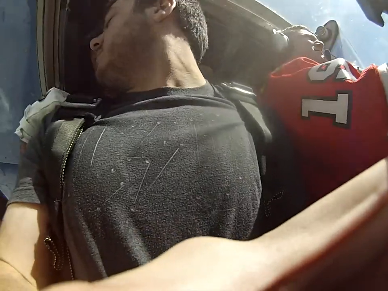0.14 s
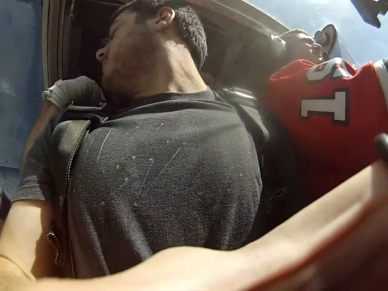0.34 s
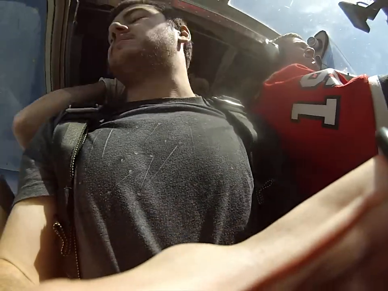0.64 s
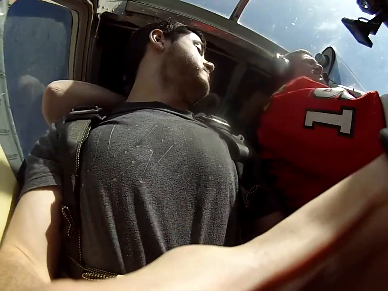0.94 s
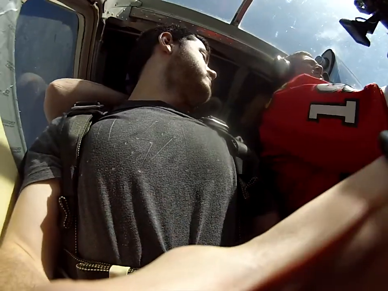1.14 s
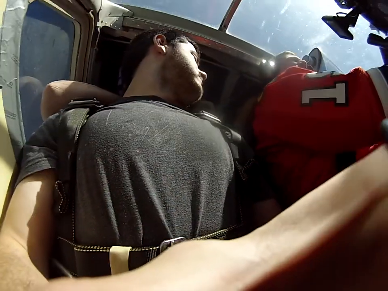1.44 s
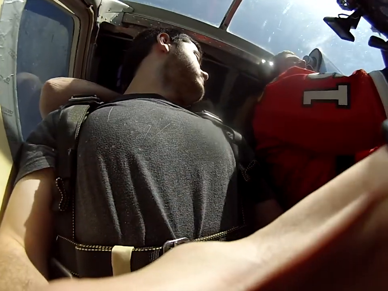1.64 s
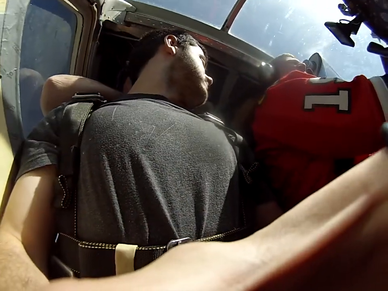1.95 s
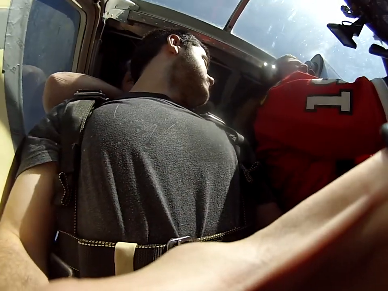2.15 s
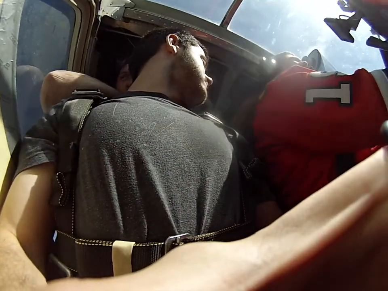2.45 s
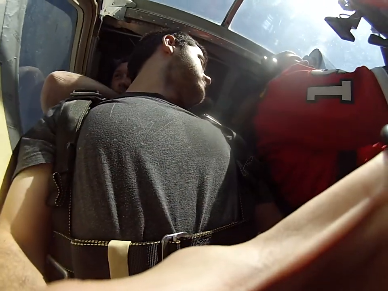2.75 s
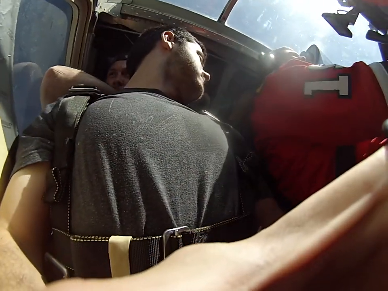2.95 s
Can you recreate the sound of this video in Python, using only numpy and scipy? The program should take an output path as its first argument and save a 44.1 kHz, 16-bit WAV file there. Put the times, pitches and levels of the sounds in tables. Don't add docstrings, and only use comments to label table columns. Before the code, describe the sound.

Light aircraft engine and propeller drone loudly and steadily inside the cabin, with rushing wind noise

```python
import sys
import numpy as np
from scipy import signal
from scipy.fft import rfft, irfft, next_fast_len
from scipy.io import wavfile
from scipy.ndimage import uniform_filter1d, map_coordinates

SR = 44100
rng = np.random.default_rng(int(sys.argv[2]) if len(sys.argv) > 2 else 0)


def int16_out(signal):
    q = np.round(np.clip(np.atleast_2d(signal).T, -1, 1) * 32767)
    wavfile.write(sys.argv[1], SR, q.astype(np.int16))


def to_linear_factor(level_db):
    exponent = np.asarray(level_db, float) / 20
    return 10 ** exponent


N = 136710


def unit(x):
    return x / np.sqrt(np.mean(x ** 2) + 1e-20)


def curve(rows):
    times, values = np.transpose(rows)
    return np.interp(np.arange(N) / SR, times, values)


def wobble(rate_hz):
    return map_coordinates(rng.standard_normal(200), [np.arange(N) * rate_hz / SR])


def filtered(x, response):
    m = next_fast_len(N + SR // 2)
    return irfft(rfft(x, m) * response(np.fft.rfftfreq(m, 1 / SR)), m)[..., :N]


def peak(hz, centre_hz, width_hz):
    return 1j * hz * width_hz / (centre_hz ** 2 - hz ** 2 + 1j * hz * width_hz)


def rush(spectrum, patchy_db):
    grains = signal.stft(rng.standard_normal(N), nperseg=512)[2]
    field = uniform_filter1d(rng.standard_normal(grains.shape), size=6, axis=0)
    field = uniform_filter1d(field, size=14, axis=1)
    noise = signal.istft(grains * to_linear_factor(patchy_db * unit(field)), nperseg=512)[1][:N]
    f, db = np.transpose(spectrum)
    return unit(filtered(noise, lambda hz: to_linear_factor(np.interp(np.log(hz + 1), np.log(f + 1), db))))


def shaft_angle():
    shaft_hz, wander_rad = 40.573, .04
    return 2 * np.pi * shaft_hz * np.arange(N) / SR + wander_rad * wobble(1.4)


def engine(turn):
    whole_db = [-33, -19, -25, -30, -42, -40, -35, -34, -43, -48, -43.5, -40, -54, -44, -58, -44, -47, -45,
                -58, -52, -56, -53, -54, -46, -46]
    half_db = [-34, -36, -44, -33.5, -30, -46, -45, -33, -50, -59, -45, -53, -56, -34, -56, -51, -48, -54,
               -52, -45, -60, -58, -56, -48, -50, -51, -51, -55, -55]
    wander_db, wander_rad = .5, .08
    orders = [(k + 1, db) for k, db in enumerate(whole_db)]
    orders += [(k + .5, db) for k, db in enumerate(half_db)]
    out = np.zeros(N)
    for order, db in orders:
        start = rng.uniform(0, 2 * np.pi)
        if order in (1, 2, 3, 4):
            start = -np.pi / 2 * (order % 2)
        loose = np.sqrt(order / 2)
        gain = to_linear_factor(db + wander_db * loose * wobble(3.14))
        out += gain * np.cos(order * turn + start + wander_rad * loose * wobble(4.4))
    return np.sqrt(2) * out


def gusts():
    # (time [s], level [dB])
    gust_rows = [(0.03, -32.5), (0.54, -31), (0.63, -37), (0.69, -30.5), (0.89, -33), (1.22, -33),
                 (1.46, -33.5), (1.54, -31.5), (1.55, -34), (1.68, -32.5), (1.73, -35.5), (1.78, -32),
                 (2.05, -35), (2.38, -30), (2.59, -31.5), (2.69, -34.5), (2.7, -33), (3.07, -31.5)]
    gust_db = curve(gust_rows)
    return gust_db - gust_db.mean() + 0.78 * wobble(9.06) + .5 * wobble(21.92)


def blade_throb(turn):
    throb_orders = [.5, 1.5, 2]
    throb_depths = [0.06, 0.014, 0.087]
    return sum(depth * np.cos(order * turn) for order, depth in zip(throb_orders, throb_depths))


def rumble(gust_db):
    # (frequency [Hz], density [dB per Hz])
    rumble_band = [(10, -50), (30, -14.5), (42, -1), (66, -2), (95, -9.5), (170, -9), (260, -13.5),
                   (355, -10), (380, -27), (800, -120)]
    return to_linear_factor(-20.5 + .3 * gust_db) * rush(rumble_band, patchy_db=0.8)


def roar(gust_db, throb):
    # (frequency [Hz], density [dB per Hz])
    roar_band = [(150, -120), (340, -17), (400, 0), (600, -3), (1000, -4.5), (1500, -8.5), (2500, -17.5),
                 (3400, -20), (4200, -34), (9000, -120)]
    panel_hz, panel_width_hz, panel_gain = 596, 32, 1
    air = to_linear_factor(-27 + 0.75 * gust_db) * (1 + 1.2 * throb) * rush(roar_band, patchy_db=.5)
    return filtered(air, lambda hz: 1 + panel_gain * np.abs(peak(hz, panel_hz, panel_width_hz)) ** 2)


def hiss(gust_db, throb):
    # (frequency [Hz], density [dB per Hz])
    hiss_band = [(2500, -62), (4000, -2.5), (4500, 0), (5200, -3), (5900, -1.5), (6900, -6.5), (8900, -8),
                 (10500, -16.5), (14200, -29), (16000, -57.5)]
    return to_linear_factor(-54.5 + 0.76 * gust_db) * (1 + 1.0 * throb) * rush(hiss_band, patchy_db=.35)


def door_whistle():
    # (time [s], level [dB])
    whistle_rows = [
        (0, -57),
        (1.6, -57),
        (1.8, -48.5),
        (2.1, -50),
        (2.3, -49),
        (2.65, -49),
        (2.85, -46),
        (3.1, -49.5),
    ]
    # (frequency [Hz], density [dB per Hz])
    whistle_band = [(2100, -57.5), (2680, -10.5), (2870, 2), (3080, -3), (3900, -57.5)]
    return to_linear_factor(curve(whistle_rows)) * rush(whistle_band, patchy_db=3.3)


def body_shade(cabin):
    # (time [s], level [dB])
    shade_rows = [
        (0, -5),
        (.55, -4.5),
        (.75, 0),
        (2.5, 0),
        (2.7, -2),
        (3.1, 0.5),
    ]
    centre_hz, width_hz = 557, 250
    buzz = filtered(cabin, lambda hz: np.abs(peak(hz, centre_hz, width_hz)) ** 2)
    return cabin + (to_linear_factor(curve(shade_rows)) - 1) * buzz


def scene():
    turn = shaft_angle()
    gust_db = gusts()
    throb = blade_throb(turn)
    air = rumble(gust_db) + roar(gust_db, throb) + hiss(gust_db, throb) + door_whistle()
    return body_shade(engine(turn) + air)[None]


def camera_case(dry):
    port_hz, port_width_hz, port_gain = 2800, 220, .6
    return filtered(dry, lambda hz: 1 + port_gain * np.abs(peak(hz, port_hz, port_width_hz)))


def limiter(x):
    limit_db, recover_db_per_s, share = -5.5, 35, .8
    ramp_db = recover_db_per_s * np.arange(N) / SR
    held_db = np.maximum.accumulate(20 * np.log10(np.abs(x) + 1e-9) + ramp_db, axis=1) - ramp_db
    duck_db = uniform_filter1d(np.clip(held_db - limit_db, 0, None), size=88, axis=1)
    return x * to_linear_factor(-share * duck_db)


def top_cut(x):
    return signal.sosfilt(signal.butter(12, 14850, fs=SR, output="sos"), x)


def record(dry):
    mix = limiter(camera_case(dry))
    return top_cut(mix)


dry = scene()
out = record(dry)
int16_out(out)
```